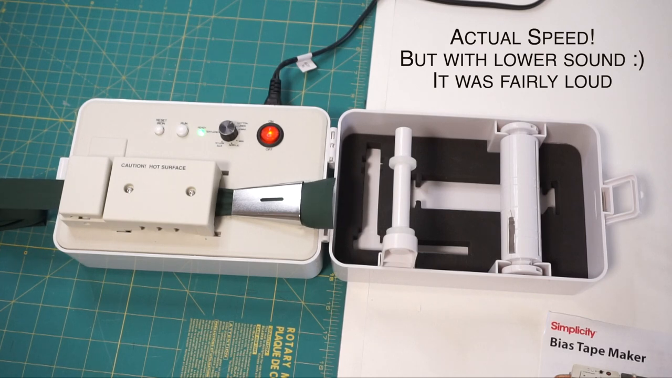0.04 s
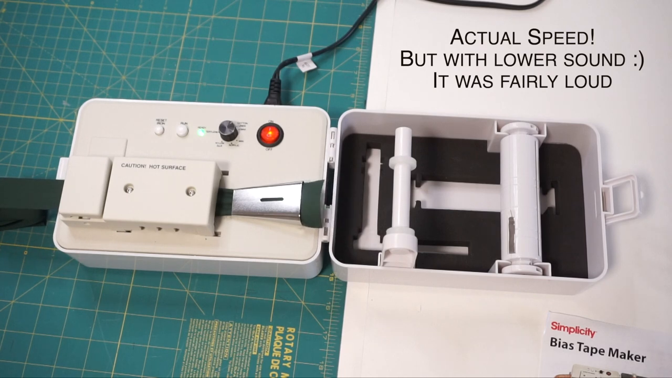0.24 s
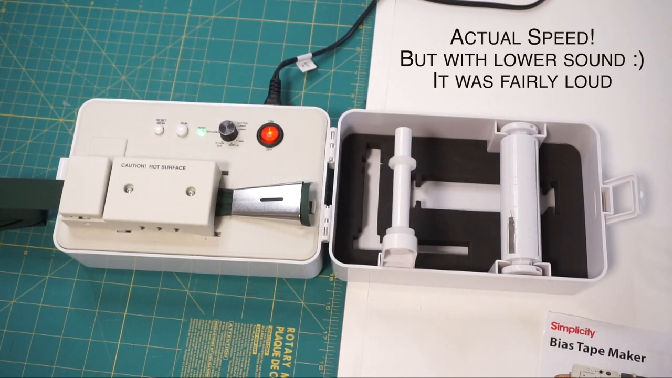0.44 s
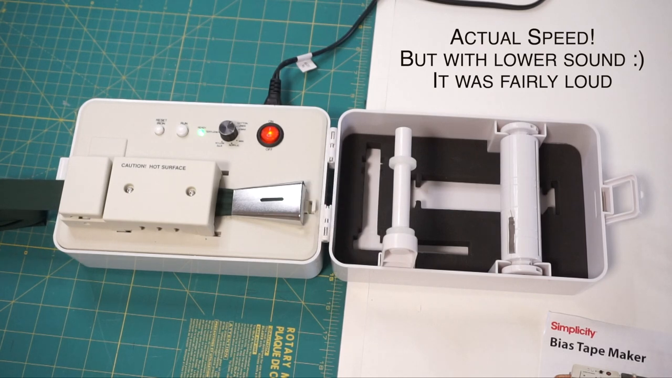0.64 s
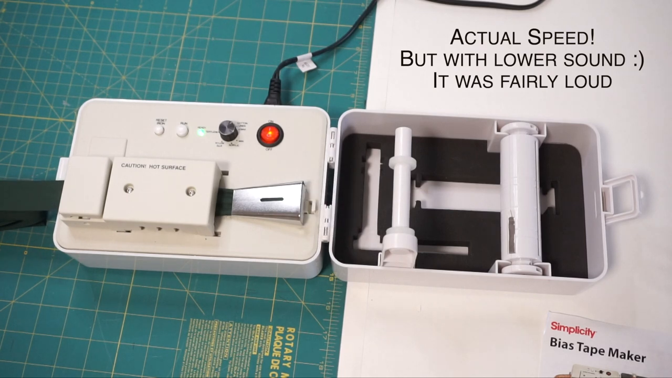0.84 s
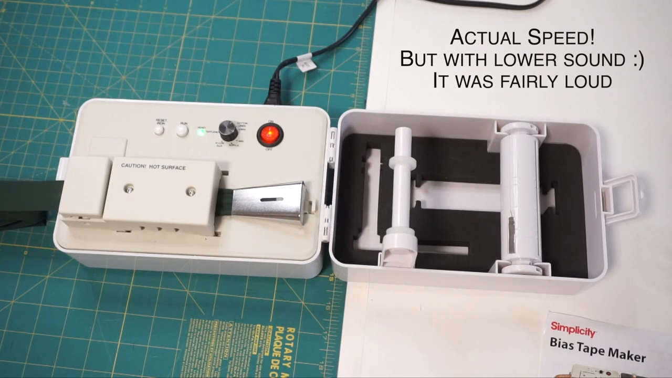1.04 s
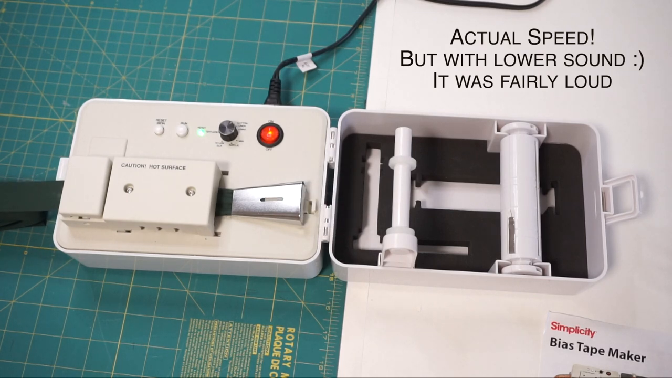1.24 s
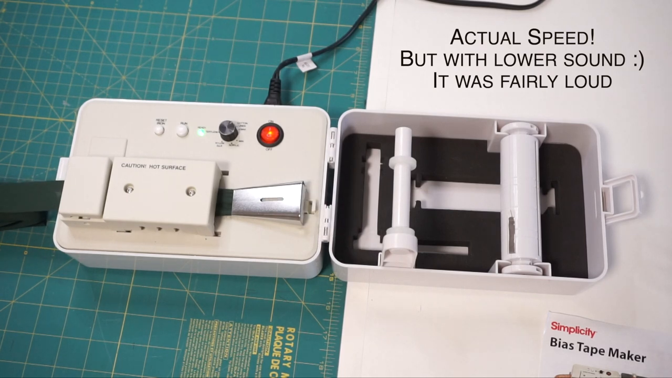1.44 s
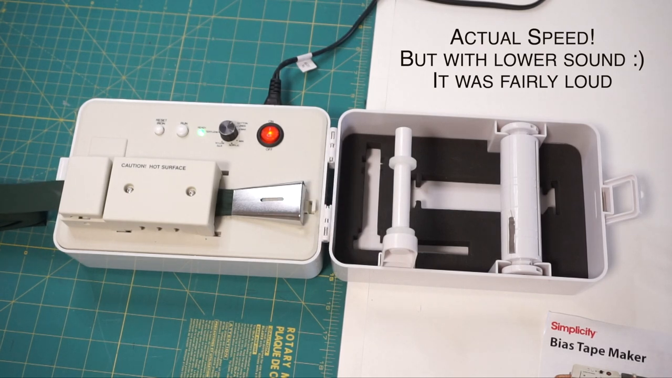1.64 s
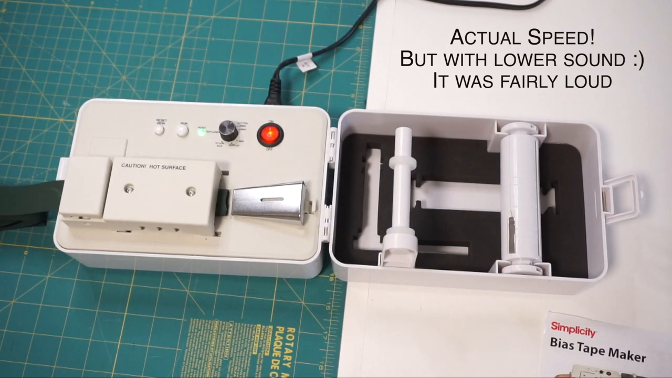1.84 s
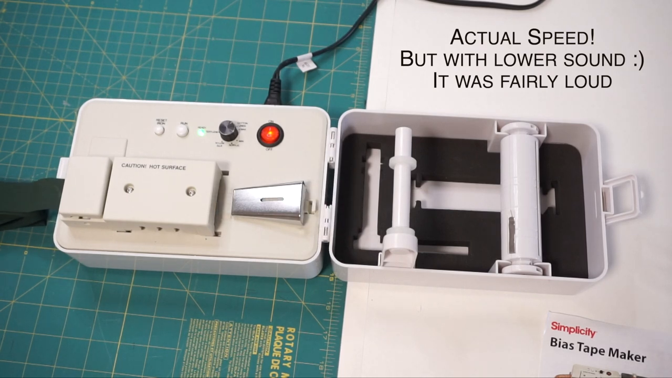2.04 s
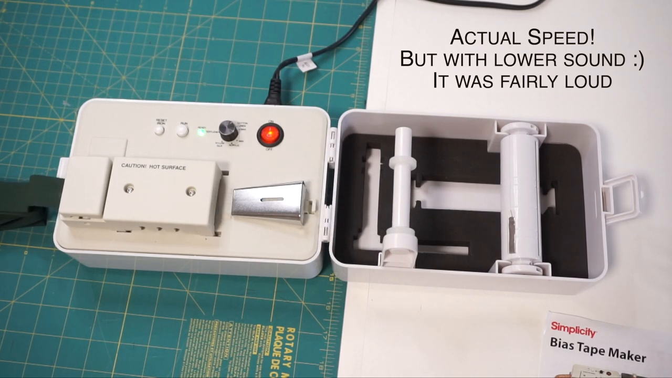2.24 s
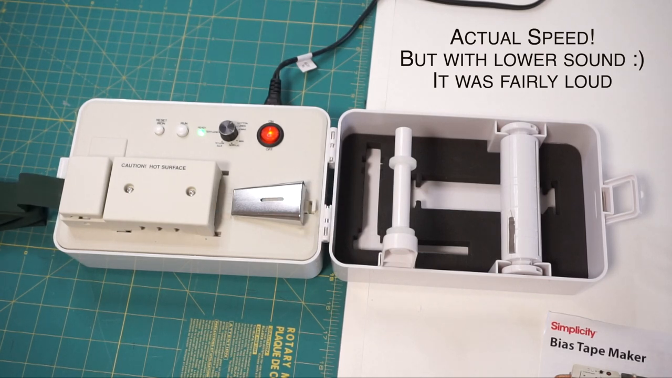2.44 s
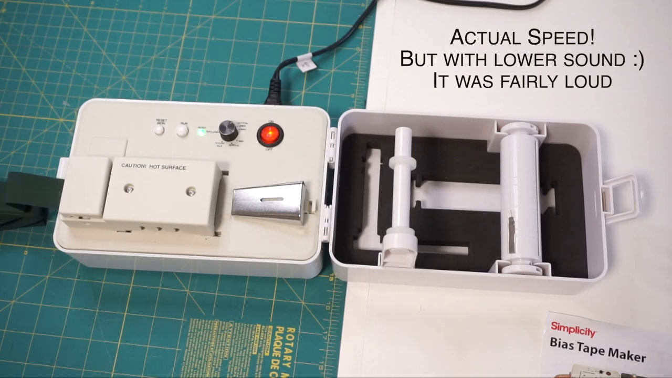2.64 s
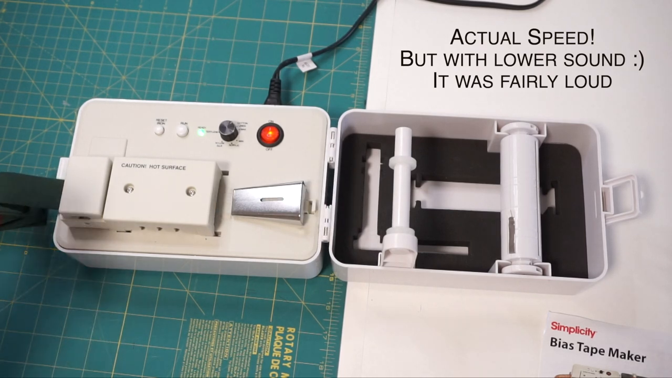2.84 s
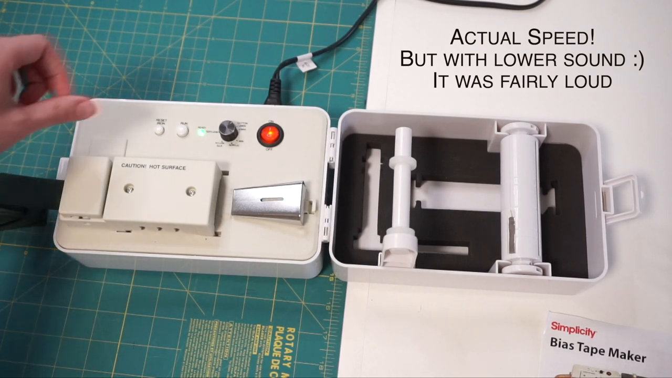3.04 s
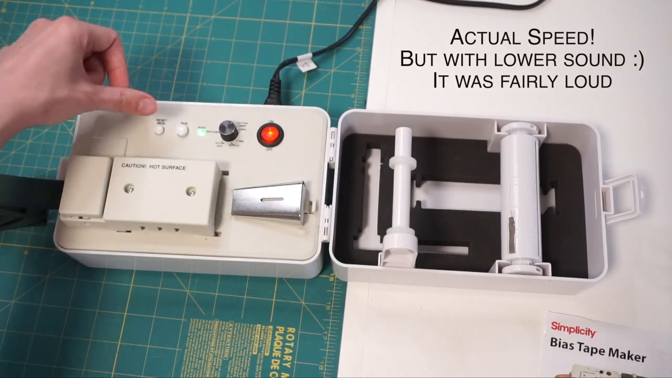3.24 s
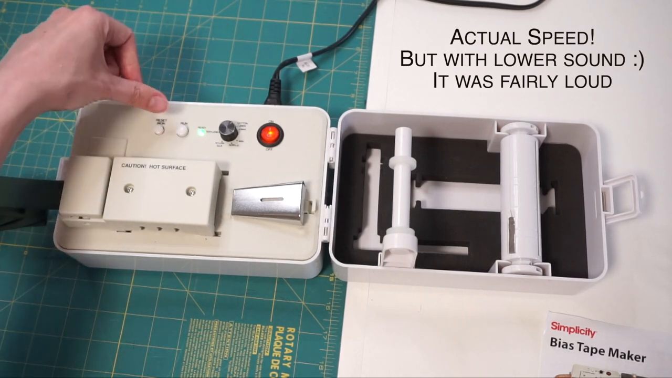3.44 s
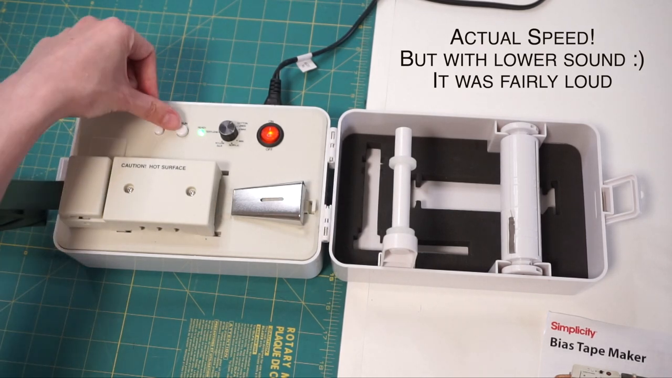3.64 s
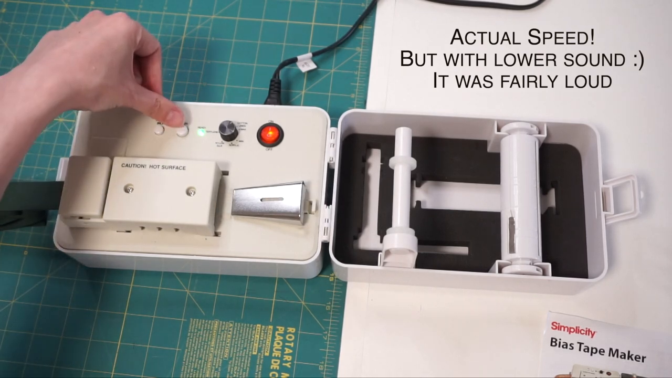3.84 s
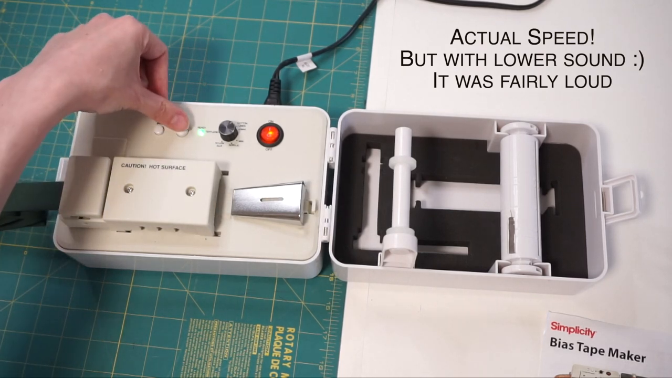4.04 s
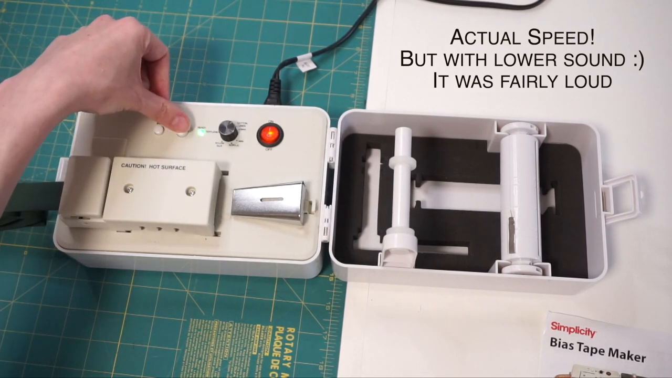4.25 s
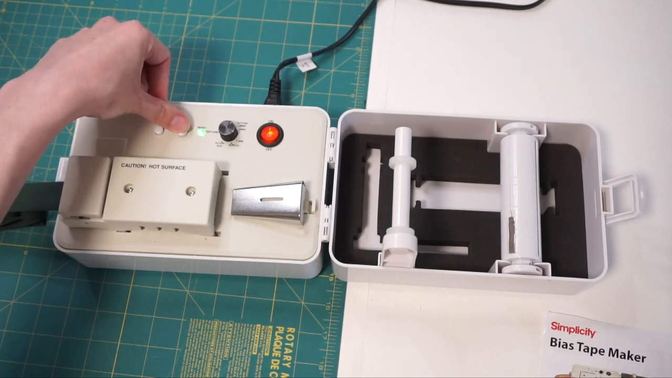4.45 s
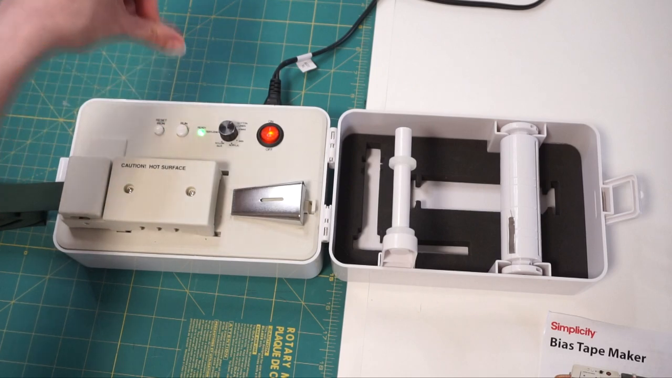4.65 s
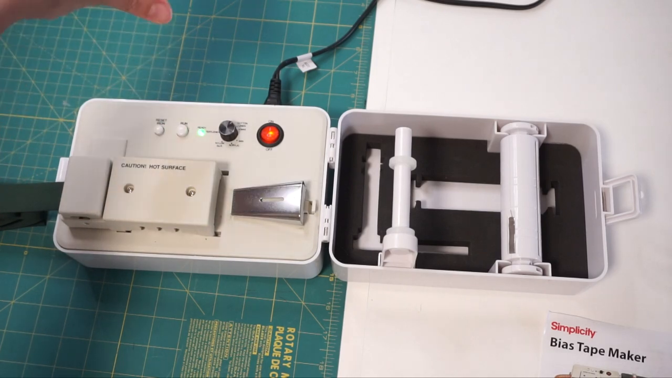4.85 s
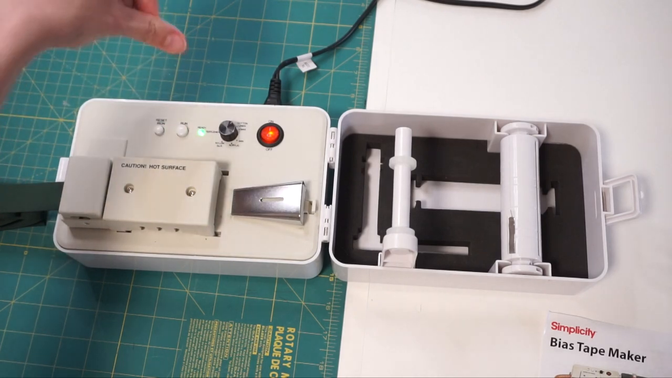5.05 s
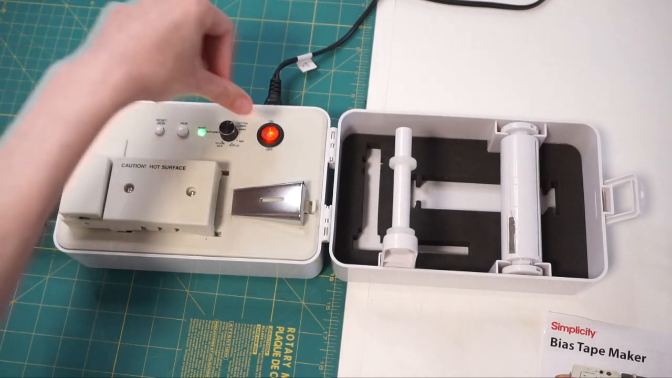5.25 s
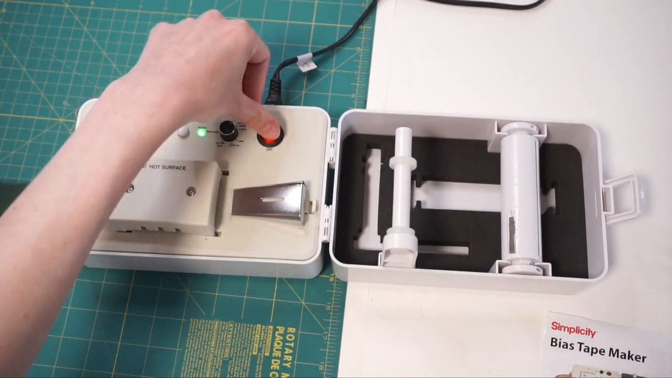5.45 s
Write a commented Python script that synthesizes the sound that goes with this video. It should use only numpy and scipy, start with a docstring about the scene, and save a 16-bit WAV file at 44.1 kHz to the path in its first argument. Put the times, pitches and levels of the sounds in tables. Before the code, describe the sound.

A small electric motor whines and hisses with rattling gears, then a button clicks and it winds down indoors.

```python
"""Tape-making machine on a table

A small room, a stereo pair close by, the machine slightly left. Its geared motor pulls fabric through the
iron: the shaft hums, the pinion whines and hisses in the plastic case, loose gears rattle, and the tones
swell and fade with the speed. The spool bumps as it turns. A thumb clicks the stop button, the motor runs
down, the room noise steps up and two faint taps follow."""
import sys
import numpy as np
from scipy import signal
from scipy.fft import rfft, irfft, next_fast_len
from scipy.io import wavfile
from scipy.ndimage import uniform_filter1d, map_coordinates

SR = 44100
rng = np.random.default_rng(int(sys.argv[2]) if len(sys.argv) > 2 else 0)


def output_pcm(signal):
    """Save a mono or channel-first signal as 16-bit PCM at the path in sys.argv[1].

    Samples are clipped to [-1, 1] before scaling.
    """
    pcm = np.clip(np.atleast_2d(signal).T, -1, 1) * 32767
    wavfile.write(sys.argv[1], SR, np.round(pcm).astype(np.int16))


N = 242991

FREE_HZ, SAG_HZ = 135, 9  # shaft rate running free, and its drop at full load
THUMB_S, THUMB_ATTACK_S, THUMB_RELEASE_S = 3.92, 0.069, 0.56  # the thumb leans on the lid
STOP_S, COAST_S, COAST_DROP_HZ = 4.391, 0.34, 12  # the motor runs down
# soft bumps of spool and thumb: start_s, level_db, thud_relative_db, hollow_hz, hollow_relative_db
BUMPS = [(0.377, -56, -27, 430, -3), (1.304, -63.5, -12, 420, 6), (2.125, -56.5, -24, 430, 5),
         (3.018, -58.5, -3, 436, 0), (3.838, -53, -22, 444.5, 1), (3.974, -54, -26, 515, 3)]
# stop button pressed, bottoming out, let go: start_s, level_db, t60_s, crack_gain, ring_relative_db
CLICKS = [(4.3595, -36.5, 0.045, .45, -10), (4.3627, -43, 0.05, .02, -9), (4.55, -49, 0.07, 2.0, -1)]


def amp(db):
    """Decibels to gain."""
    return 10 ** (np.asarray(db) / 20)


def unit(x):
    """Scale to rms 1."""
    return x / np.sqrt(np.mean(x ** 2) + 1e-20)


def along(points, hz):
    """Interpolate (Hz, value) points on a log frequency axis."""
    f, v = np.transpose(points)
    return np.interp(np.log(hz + 1), np.log(f + 1), v)


def curve(points):
    """Interpolate (s, value) points at every sample."""
    return np.interp(np.arange(N) / SR, *np.transpose(points))


def wobble(rate):
    """A smooth random curve, rate knots a second."""
    return map_coordinates(rng.standard_normal(int(N * rate / SR) + 4), [np.arange(N) * rate / SR])


def filtered(x, response):
    """Filter x by a gain given as a function of frequency."""
    m = next_fast_len(x.shape[-1] + 8192)
    return irfft(rfft(x, m) * response(np.fft.rfftfreq(m, 1 / SR)), m)[..., :x.shape[-1]]


def noise(spectrum):
    """Noise of rms 1, coloured by (Hz, dB) points."""
    return unit(filtered(rng.standard_normal(N), lambda hz: amp(along(spectrum, hz))))


def bell(x, centre, width):
    """Resonance curve of height 1, with its full width at half height."""
    return 1 / (1 + (2 * (x - centre) / width) ** 2)


def resonant_noise(modes):
    """Noise of rms 1 through (Hz, width Hz, dB) resonances."""
    response = lambda hz: sum(amp(db) * bell(hz, centre, width) for centre, width, db in modes)
    return unit(filtered(rng.standard_normal(N), response))


def patchy(x, depth_db):
    """Random gain patches favour now one band, now another."""
    z = signal.stft(x, nperseg=512)[2]
    field = uniform_filter1d(rng.standard_normal(z.shape[1:]), size=3, axis=0)
    field = uniform_filter1d(field, size=16, axis=1)
    return signal.istft(z * amp(depth_db * unit(field)), nperseg=512)[1][:, :N]


def since(s):
    """Seconds since a moment, zero before it."""
    return np.maximum(np.arange(N) / SR - s, 0)


def ramp(start_s, length_s):
    """A straight rise from 0 to 1."""
    return np.clip(since(start_s) / length_s, 0, 1)


def fade(t, attack_s, t60_s):
    """Envelope of a blow."""
    return (1 - np.exp(-t / attack_s)) * amp(-60 * t / t60_s)


def loading(speed):
    """Load on the motor, 0 running free to 1 dragging hard."""
    return np.clip((FREE_HZ - speed) / SAG_HZ, 0, 1)


def thumb():
    """Pressure on the lid, 0-1: it builds quickly and eases ever more slowly."""
    return ramp(THUMB_S, THUMB_ATTACK_S) * (1 - ramp(THUMB_S + THUMB_ATTACK_S, THUMB_RELEASE_S)) ** 2


def coasting():
    """Gain of the drive: 1 while powered, then falling ever faster."""
    return amp(-60 * (since(STOP_S) / COAST_S) ** 2)


def room(x, wet_db):
    """Direct sound plus a different diffuse tail at each microphone."""
    # decay of the room: frequency_hz, t60_s
    decay = [(150, 0.27), (1000, 0.49), (3000, 0.45), (10000, 0.42)]
    # colour of the room's answer: frequency_hz, gain_db
    colour = [(130, -32), (450, -19), (1000, 3.5), (2300, 0.5), (5000, 2.5), (10000, -3.5)]
    hz, t, z = signal.stft(rng.standard_normal((2, SR // 2)), SR, nperseg=256)
    tail = signal.istft(z * amp(-60 * t / along(decay, hz)[:, None]), SR, nperseg=256)[1]
    tail = tail * (np.arange(tail.shape[1]) / SR > .003)  # reflections start after 3 ms
    wet = signal.fftconvolve(x[None], tail / np.linalg.norm(tail[0]), axes=1)[:, :N]
    return x + amp(wet_db) * filtered(wet, lambda hz: amp(along(colour, hz)))


def ambience(quiet_db=-80.5, loud_db=-63):
    """Restless room tone, alike at both microphones only in the bass, that steps up near the end."""
    # spectrum of the room tone: frequency_hz, relative_db
    air = [(15, -1), (30, -6), (90, 1), (200, -3.5), (400, -6.5), (700, -11.5), (915, -6.5), (1030, -12.5),
           (2000, -16.5), (3000, -17.5), (6500, -18), (11500, -20.5)]
    side_db = [(40, -8), (110, -21), (220, -2.5), (1000, 5.5), (1800, 3.0), (10000, 0)]
    mid, side = patchy(np.array([noise(air), noise(air)]), depth_db=1.8)
    side = filtered(side, lambda hz: amp(along(side_db, hz)))
    level_db = quiet_db + (loud_db - quiet_db) * ramp(start_s=4.948, length_s=0.0056)
    return amp(level_db) * np.array([mid + side, mid - side])


def taps():
    """Faint taps with one hollow ring."""
    # taps after the motor has stopped: start_s, level_db
    hits = [(5.112, -56), (5.359, -58)]
    body = unit(filtered(rng.standard_normal(N), lambda hz: bell(hz, 920, 110) ** 2))
    return sum(amp(db) * body * fade(since(s), 0.0026, 0.089) for s, db in hits)


def lid_buzz(pressed_db=-67, click_db=-67.5):
    """The lid passes on a dull buzz while it is pressed and just after each click."""
    # resonances of the buzzing lid: pitch_hz, width_hz, relative_db
    modes = [(586, 140, 1), (910, 130, 0.5)]
    jolts = sum(fade(since(s), 0.0037, t60_s=0.51) for s, *_ in CLICKS)
    return (amp(pressed_db) * thumb() + amp(click_db) * jolts) * resonant_noise(modes)


def bumps(hollow_width_hz=130):
    """Knocks clack in the shell, each with its own hollow note, chatter on and thud into the table."""
    # resonances of the shell: pitch_hz, width_hz, relative_db
    shell = [(272, 39, -17), (610, 250, -12), (920, 200, -13), (1250, 710, -11), (2180, 820, -9)]
    thud = noise([(25, -29), (70, 11), (200, 9), (400, -29), (1000, -60)])
    out = np.zeros(N)
    for s, db, thud_db, hollow_hz, hollow_db in BUMPS:
        chatter = resonant_noise([*shell, (hollow_hz, hollow_width_hz, hollow_db)])
        blow = fade(since(s), 0.0006, 0.14) + 0.33 * fade(since(s), 0.008, 0.65)
        out += blow * (amp(db) * chatter + amp(db + thud_db) * thud)
    return out


def button(rise_s=.0002):
    """The plastic button snaps: a sharp crack, a short clatter and a ring of the lid."""
    # spectrum of the clatter: frequency_hz, relative_db
    snap = [(100, -34), (400, -24), (850, -18), (1250, -8), (1550, 2), (2100, 1.5), (2700, 3), (3400, -7),
            (4500, -14), (11000, -26), (14000, -50)]
    # modes of the lid under the button: pitch_hz, relative_db, t60_s
    lid = [(940, -13, 0.16), (1490, -3, 0.082), (1750, -7, .045)]
    clatter = noise(snap)
    crack = noise([(300, -12.0), (1000, 0.5), (3000, 2), (7000, -3), (11000, -12), (14000, -34)])
    out = np.zeros(N)
    for s, level_db, t60_s, crack_gain, ring_db in CLICKS:
        t = since(s)
        strike = clatter * fade(t, rise_s, t60_s) + crack_gain * crack * fade(t, rise_s, 0.068)
        ring = sum(amp(db) * np.sin(2 * np.pi * hz * t) * fade(t, rise_s, t60) for hz, db, t60 in lid)
        out += amp(level_db) * (strike + amp(ring_db) * ring)
    return out


def grind(angle, speed, free_db=-64.5, load_db=-11, shake_db=4.5):
    """Without load the teeth run slack and grind, more so when a bump has shaken them."""
    # spectrum of the slack teeth: frequency_hz, relative_db
    spectrum = [(600, -34), (780, -20), (860, -14), (930, 0), (1010, -5.5), (1150, -8.5), (1300, -1.5),
                (1450, 0.5), (1700, -2.5), (2000, -25), (3000, -50)]
    shaken = sum(fade(since(s), .02, t60_s=0.66) for s, *_ in BUMPS)
    level_db = free_db + load_db * loading(speed) + shake_db * shaken
    return amp(level_db + 0.87 * wobble(24.9)) * (1 + 0.34 * np.cos(angle)) * noise(spectrum)


def rasp(angle, per_second=170, usual_s=.048, glide_share=.01, scatter_db=3.5):
    """Teeth catch at random and give short gliding chirps, pulsed by the turning shaft."""
    # usual strength of a chirp: pitch_hz, level_db
    levels = [(1700, -65), (2000, -62), (2300, -63), (2800, -63), (3500, -67), (4100, -64.5), (4900, -63.5),
              (5300, -67), (6000, -60), (6700, -61)]
    low_hz, high_hz = levels[0][0], levels[-1][0]
    count = int(per_second * N / SR)
    start, place = rng.random((count, 2)).T[:, :, None]
    size, life, glide = rng.standard_normal((count, 3)).T[:, :, None]
    hz = low_hz * (high_hz / low_hz) ** place
    t = np.arange(int(2 * usual_s * SR)) / SR
    length_s = usual_s * np.clip(2 ** (life / 2), .5, 2)
    progress = np.minimum(t / length_s, 1)
    envelope = amp(along(levels, hz) + scatter_db * size) * np.sin(np.pi * np.sqrt(progress))
    chirps = envelope * np.sin(2 * np.pi * hz * t * (1 + glide_share * glide * progress / 2))
    at = (start * N).astype(int) + np.arange(len(t))
    return np.bincount(at.ravel(), chirps.ravel(), N)[:N] * (1 + 0.15 * np.cos(angle))


def rattle(angle, trim_db=-6):
    """Loose gears knock about once a turn, unevenly, and ring the housing near 2 kHz."""
    # course of the rattle: time_s, level_db (before the trim)
    levels = [(0.0, -48), (0.02, -55), (0.35, -60), (0.42, -48.5), (0.75, -57), (0.86, -46.5), (1.02, -75),
              (1.15, -55), (1.22, -63), (1.32, -55), (1.43, -50), (1.81, -69), (2.13, -48.5), (2.33, -52.5),
              (2.75, -55), (2.83, -57), (3.09, -51), (3.17, -50), (3.69, -60), (3.95, -50), (4.01, -52),
              (4.25, -57), (4.3, -59)]
    housing = lambda hz: (bell(hz, 1893, 180) + 0.44 * bell(hz, 2040, 190)
                          + 0.66 * bell(hz, 2460, 370) + 0.14 * bell(hz, 3270, 264))
    pulses = ((1 + np.cos(angle + wobble(60))) / 2) ** 2
    knocks = pulses * amp(wobble(90)) * rng.standard_normal(N)
    return amp(curve(levels) + trim_db) * unit(filtered(knocks, housing))


def squeal(angle, speed):
    """High shaft multiples swell as the speed carries them across a resonance, most under load."""
    # narrow resonances: pitch_hz, width_hz, level_db (before the load's gain)
    modes = [(2555, 50, -69), (2670, 45, -65), (2800, 38, -57.5), (3143, 38, -65), (3730, 80, -66),
             (3970, 60, -65), (4690, 110, -65.5)]
    coarse = np.arange(0, N, 100)
    out = np.zeros(N)
    for order in range(14, 42):
        gain = sum(amp(db) * bell(order * speed[coarse], hz, width) for hz, width, db in modes)
        phase = order * angle + 0.34 * wobble(35) + rng.uniform(0, 2 * np.pi)
        out += np.interp(np.arange(N), coarse, gain) * np.sin(phase)
    return np.sqrt(2) * amp(-5.5 + 8.0 * loading(speed)) * out


def scraping(angle, repeat_share=.2, play_rad=.014):
    """Roughness under the teeth, in two channels: mostly new, partly the same every turn."""
    surface = rng.standard_normal((2, 340))
    place = (angle + play_rad * wobble(70)) / (2 * np.pi) * surface.shape[1]
    repeating = np.array([map_coordinates(row, [place], mode="grid-wrap") for row in surface])
    return np.sqrt(1 - repeat_share) * rng.standard_normal((2, N)) + np.sqrt(repeat_share) * repeating


def hiss(angle, speed, free_db=-46, drag_db_per_hz=0.0419):
    """Each of the eight pinion teeth scrapes past with its own force and excites the case."""
    # spectrum of the scraping: frequency_hz, relative_db
    scrape = [(40, -32), (130, -20), (300, -29.5), (450, -21), (700, -28.5), (900, -8.5), (1400, -31),
              (1900, -14), (3500, -19), (4400, -13), (6200, -5.5), (9000, -12.5), (10600, -5.5),
              (11600, -26.5)]
    # resonances and notches of the case: centre_hz, width_hz, gain_db
    case = [(863, 91, -34), (1104, 36, -7), (1305, 110, 16.5), (1535, 106, 10), (1876, 390, 14),
            (1906, 34, -18), (2510, 370, 11), (2835, 57, 13), (3130, 710, 10.5), (3693, 170, 7),
            (4033, 177, 8), (4870, 170, 5), (5836, 150, 7), (6540, 90, 5.5), (7380, 770, 4.5),
            (8190, 127, 7.5), (8460, 380, 4), (8920, 470, 7.5), (7800, 160, -2.5), (9120, 110, -4.5),
            (10780, 155, -13), (11020, 150, 8.5), (11350, 199, 11)]
    # sharp resonances of the gear train: pitch_hz, relative_db (to the hiss around them)
    gear_rings = [(3962, -3), (4673, -4), (5905, -3), (6202, 2), (6525, -15), (6621, 1), (7111, -7),
                  (7440, -9), (7714, 3), (8177, -11), (8419, 2), (8603, -3), (8920, -8), (9916, 0)]
    # stereo width of the hiss: frequency_hz, side_minus_mid_db
    spread = [(60, -43), (450, -11), (1000, 1), (2300, -25), (3100, -5.5), (3500, -12), (4000, -8.5),
              (5200, -0.5), (6600, -4.5), (7100, -8), (7600, -2), (11000, -4)]

    def colour(hz):
        case_db = sum(db * bell(hz, centre, width) for centre, width, db in case)
        dips_db = 6 * bell(hz, 2250, 850) + 7 * bell(hz, 2852, 80)
        rings = sum(amp(db) * bell(hz, centre, 14.0) for centre, db in gear_rings)
        return amp(along(scrape, hz) + case_db - dips_db) * (1 + rings)

    uneven_db = 0.19 * wobble(810) + 0.53 * wobble(60) + 0.41 * wobble(12)
    force = (1 + 0.16 * np.cos(8 * angle)) * (1 + 0.021 * np.cos(angle)) * amp(uneven_db)
    friction = patchy(force * scraping(angle), depth_db=1.3)
    mid, side = unit(filtered(friction, colour))
    side = filtered(side, lambda hz: amp(along(spread, hz)))
    return amp(free_db + drag_db_per_hz * (FREE_HZ - speed)) * np.array([mid + side, mid - side])


def hum(angle, speed, lag_s=0.064):
    """The unbalanced shaft shakes the case once a turn, most near its free speed."""
    # the shaft tone as the case favours it: pitch_hz, level_db
    first_levels = [(118, -75), (127.5, -77), (130, -71), (132.5, -61.5), (135.5, -58.5), (141, -64)]
    # its third harmonic: pitch_hz, level_db
    third_levels = [(354, -78), (378, -94), (393, -73.5), (403, -64.5), (409, -70), (423, -68.5)]
    t = np.arange(N) / SR
    swell_db = 5.5 * bell(t, 4.46, 0.035)  # briefly louder and purer as the motor starts to coast
    dip_db = -7 * bell(t, THUMB_S + THUMB_ATTACK_S, .06)  # the settling thumb damps the hum
    lagged_speed = np.interp(t - lag_s, t, speed)  # the case takes a moment to follow
    first = amp(along(first_levels, lagged_speed) + swell_db + dip_db + wobble(11)) * np.sin(angle)
    third_db = along(third_levels, 3 * speed) + (1 + 2 * thumb()) * wobble(18) - 5.2 * swell_db
    third = amp(third_db) * np.sin(3 * angle)
    run_out = amp(-60 * since(4.48) / 0.47)  # the shaft outlasts the gears
    return np.sqrt(2) * (run_out * first + coasting() * third)


def whine(angle, speed, slack_rad=.24, flutter=0.27, steadying=0.7):
    """Gear tones: rough while the teeth run slack, cleaner when load presses them together."""
    # strong tones as the case favours them, by shaft multiple (8 is the mesh): pitch_hz, level_db
    strong_tones = {7: [(865, -78), (900, -68), (930, -65), (955, -68), (975, -75)], 8: [(950, -58.5),
                    (985, -60), (1000, -57), (1015, -60), (1032, -70), (1055, -64.5), (1075, -61.5),
                    (1105, -61.5), (1130, -69)], 9: [(1070, -76), (1100, -73), (1195, -74), (1215, -60.5),
                    (1232, -62), (1245, -70)], 14: [(1660, -75), (1745, -64.5), (1790, -65), (1820, -68),
                    (1860, -62), (1910, -67)], 15: [(1780, -56), (1820, -60), (1856, -53.5), (1885, -59),
                    (1910, -68), (1945, -58), (1975, -56), (2010, -63), (2080, -70)], 16: [(1900, -72),
                    (1945, -55.5), (1990, -56), (2025, -68), (2060, -62), (2120, -64), (2185, -65),
                    (2240, -71)]}
    # the other gear tones: shaft_multiple, free_db, loaded_db
    weak_tones = [(2, -93, -90), (4, -86, -98), (6, -96, -80), (6.65, -72, -90), (9.7, -73, -78),
                  (10, -70.5, -73), (11, -72, -78), (12, -73, -69), (13, -71, -85), (17, -70, -64),
                  (19, -72, -73), (20, -72, -71), (20.6, -68, -80), (21, -71, -71), (23, -73, -70)]
    # a tone flares for a moment: centre_s, shaft_multiple, boost_db, length_s
    flares = [(0.04, 7, 4.5, .2), (0.49, 16, 5, .08), (1.68, 8, 4, .25), (2.05, 15, 3, .12),
              (3.1, 14, 10, .13)]
    t = np.arange(N) / SR
    load = loading(speed)
    looseness = 1 - steadying * load
    levels_db = {order: along(points, order * speed) for order, points in strong_tones.items()}
    for order, free_db, loaded_db in weak_tones:
        levels_db[order] = free_db + load * (loaded_db - free_db)
    for s, order, boost_db, length_s in flares:
        levels_db[order] += boost_db * np.exp(-(2 * (t - s) / length_s) ** 2)
    slack = slack_rad * looseness * (1 + 1.5 * thumb())  # timing play grows under the thumb
    out = np.zeros(N)
    for order, level_db in levels_db.items():
        force = amp(level_db + 2.2 * looseness * wobble(16)) * (1 + flutter * looseness * wobble(90))
        out += force * np.sin(order * angle + slack * wobble(70) + rng.uniform(0, 2 * np.pi))
    return np.sqrt(2) * out


def scene(jitter_hz=.3):
    """Shaft speed and thumb pressure govern the machine, which stands slightly left of the pair."""
    # the motor slows whenever the fabric drags: time_s, shaft_hz
    shaft_rate = [(0.0, 133.6), (0.2, 128.6), (0.32, 126.6), (0.38, 127.3), (0.42, 129.3), (0.58, 129.8),
                  (0.68, 126.0), (0.79, 125.3), (0.92, 120.8), (1.05, 118.5), (1.21, 127.4), (1.35, 131.5),
                  (1.52, 134.3), (1.73, 135.8), (1.97, 131.2), (2.09, 131.2), (2.17, 135.0), (2.27, 134.1),
                  (2.37, 134.7), (2.52, 130.2), (2.59, 126.5), (2.65, 124.6), (2.77, 124.4), (2.97, 130.5),
                  (3.24, 136.2), (3.43, 136.6), (3.82, 135.5), (3.88, 138.9), (3.99, 137.5), (4.03, 145.5),
                  (4.13, 140.4), (4.33, 138.5), (4.36, 135.6), (4.42, 137.3)]
    speed = curve(shaft_rate) + jitter_hz * wobble(18) - COAST_DROP_HZ * ramp(STOP_S, COAST_S)
    angle = 2 * np.pi * np.cumsum(speed) / SR
    running = coasting()
    gear_damping, hiss_damping = amp(-5 * thumb()), amp(-6 * thumb())
    shaft = hum(angle, speed)
    tones = room(running * gear_damping * (whine(angle, speed) + squeal(angle, speed)), wet_db=-17)
    teeth = gear_damping * (grind(angle, speed) + rasp(angle))
    gears = room(running * (teeth + rattle(angle)), wet_db=-7.5)
    knocks = room(bumps() + button() + lid_buzz() + taps(), wet_db=-3)
    fizz = running * hiss_damping * hiss(angle, speed)
    centre = fizz.mean(axis=0)  # the hiss is already wide; its centre feeds the room
    fizz = fizz - centre + room(centre, wet_db=-7.5)
    left_minus_right_db = [(700, 0.078), (3500, 0.67), (5000, 1.5), (6800, 3.2), (10000, 1.3)]
    lean = lambda hz: amp(np.outer([.5, -.5], along(left_minus_right_db, hz)))
    return filtered(shaft + tones + gears + knocks + fizz, lean) + ambience()


def record(dry, top_hz=11750):
    """Nothing is kept above the band limit."""
    return filtered(dry, lambda hz: hz < top_hz)


dry = scene()
out = record(dry)
output_pcm(out)
```